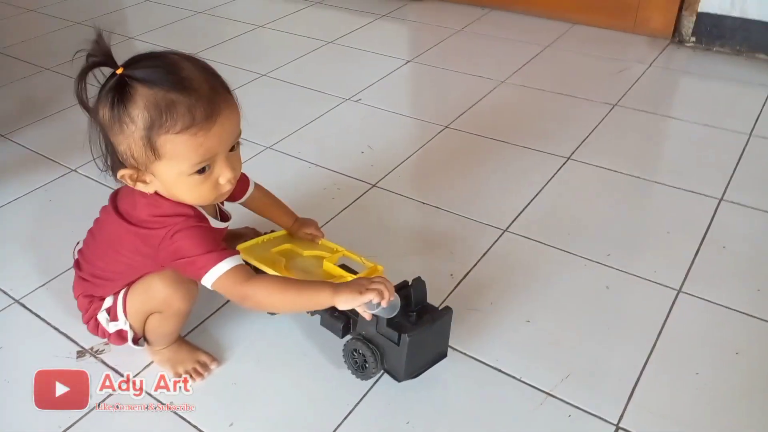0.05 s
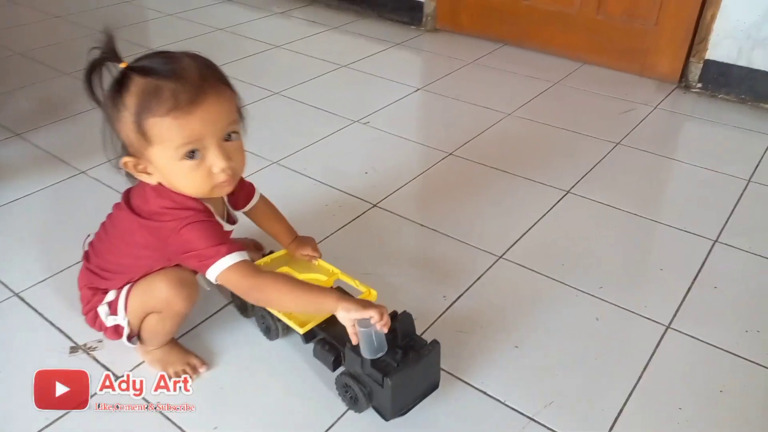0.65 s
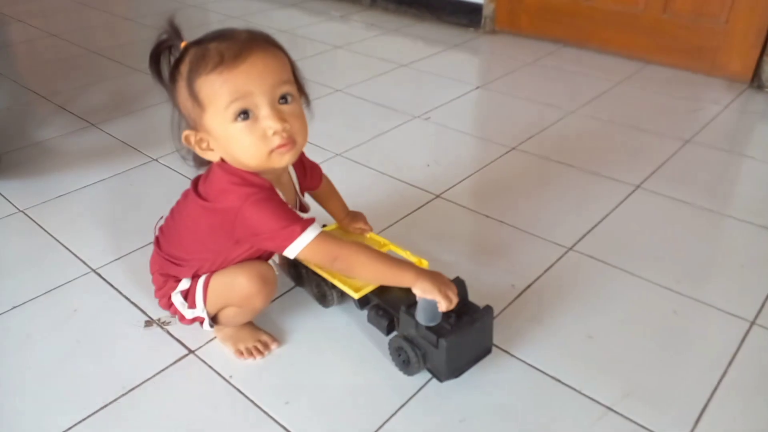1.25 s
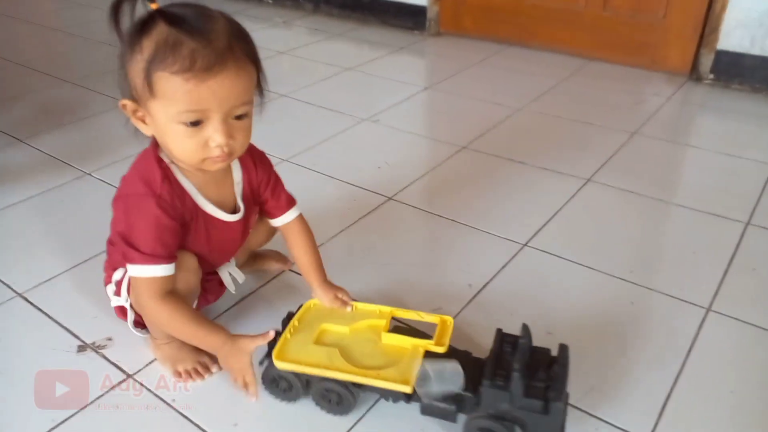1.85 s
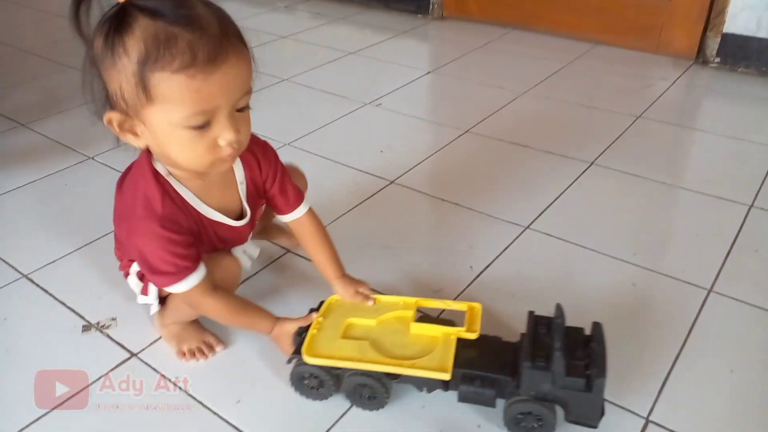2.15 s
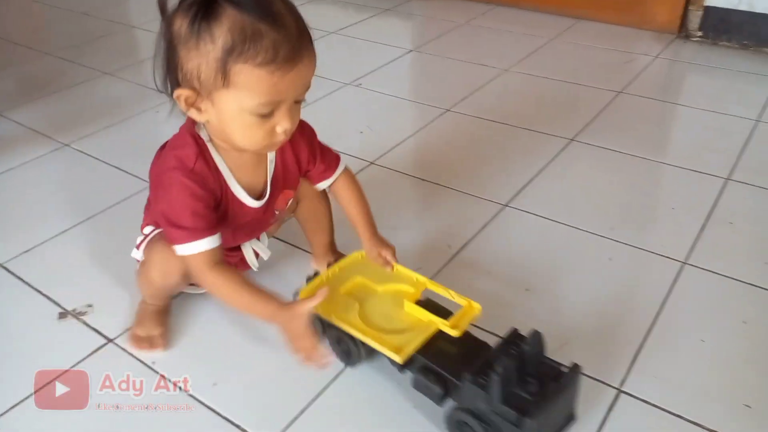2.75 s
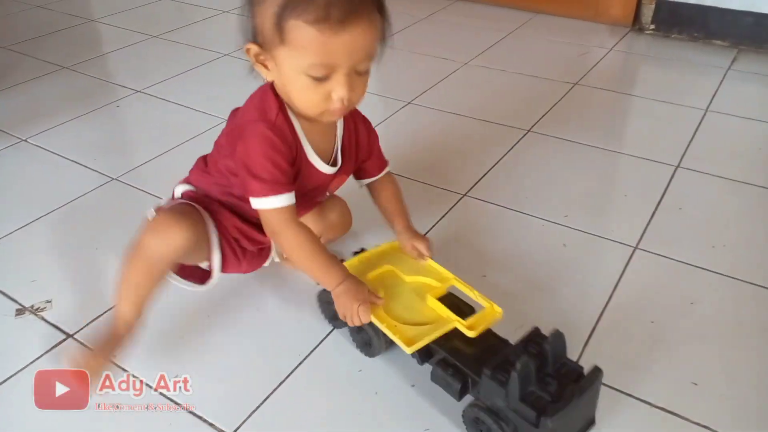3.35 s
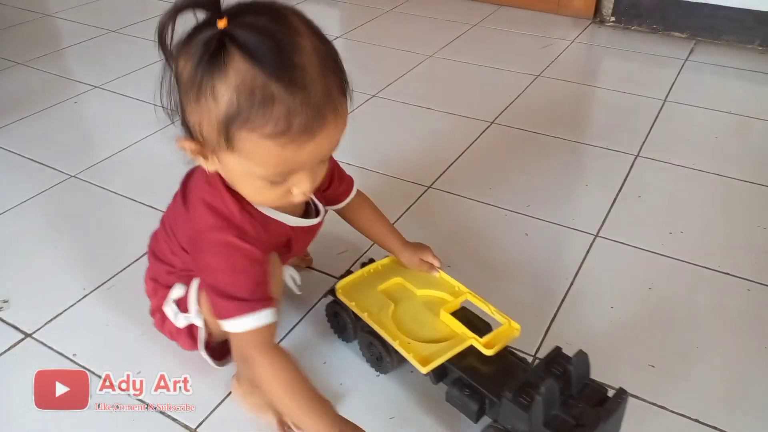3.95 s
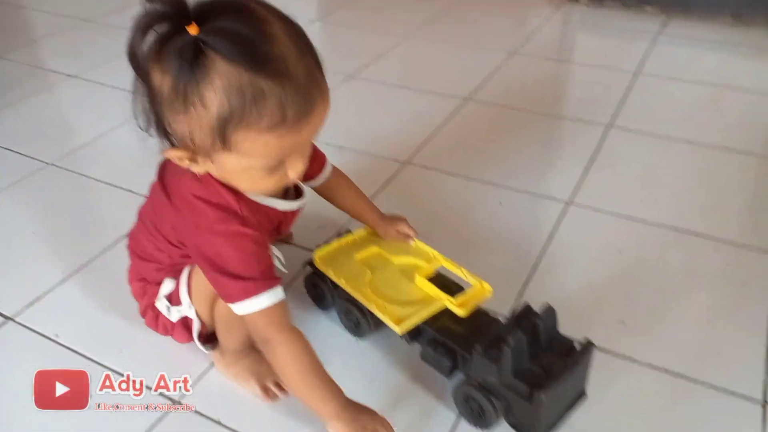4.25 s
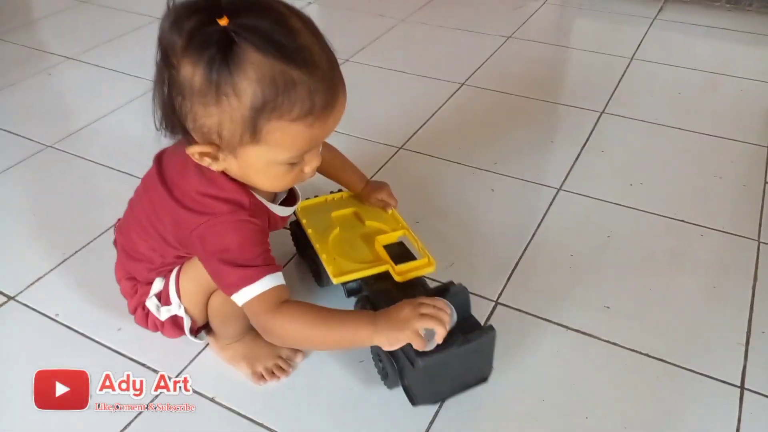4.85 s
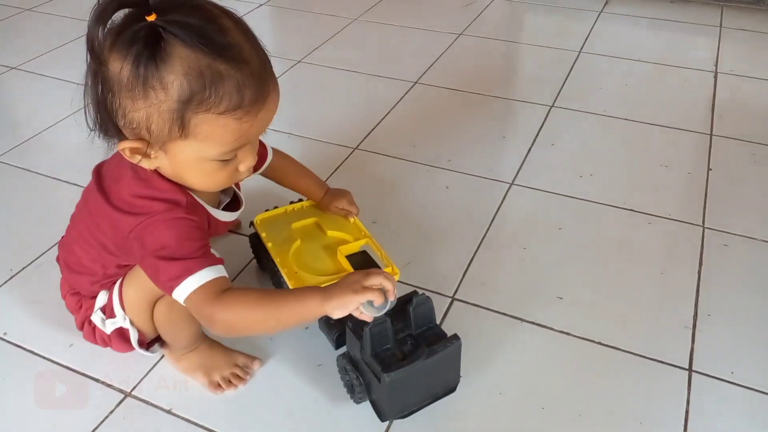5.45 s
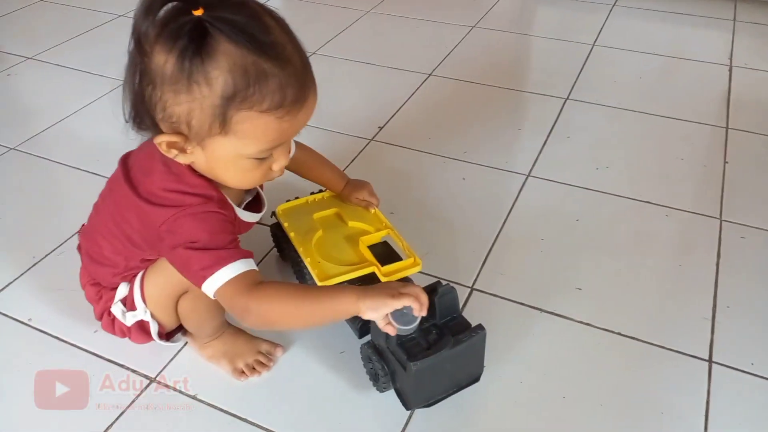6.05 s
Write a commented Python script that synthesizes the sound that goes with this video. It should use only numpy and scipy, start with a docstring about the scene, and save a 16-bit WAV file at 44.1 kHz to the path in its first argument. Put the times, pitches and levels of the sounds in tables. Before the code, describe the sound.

Hollow knocks and rattling wheels of a toy truck pushed across tiles, with a little plastic cup clattering down.

```python
"""Rumble, chatter and hollow knocks: a plastic toy truck is shoved over tiles in a hard, echoing room.
Its wheels drum the shell and scrape the glaze; blows ring its body, panels and edges.
A small plastic cup falls off and bounces to rest, sounding its wall, base and rim.
Hands and clothes brush the toy. Behind it are a low hum and a faint far whine;
the hand-held microphone is bumped a few times."""
import sys
import numpy as np
from scipy import signal
from scipy.fft import rfft, irfft, next_fast_len
from scipy.io import wavfile

SR = 44100
rng = np.random.default_rng(int(sys.argv[2]) if len(sys.argv) > 2 else 0)


def to_wav(sig):
    """Store sig (one row per channel, or 1-D mono) as 16-bit WAV at the path in sys.argv[1].

    Samples outside -1..1 are clipped; the rate is SR.
    """
    pcm = np.clip(np.atleast_2d(sig), -1, 1) * 32767
    pcm = np.round(pcm).astype(np.int16)
    wavfile.write(sys.argv[1], SR, pcm.T)  # frames by channels


N = 272979

# Room decay. Each row: frequency in Hz, t60 in seconds.
ROOM_DECAY = [(150, 0.28), (700, 0.53), (1800, 0.61), (4200, 0.41), (6500, 0.52), (14000, 0.75)]
# Noise spectra. Each row: frequency in Hz, relative density in dB.
AIR_SPECTRUM = [(25, -12.5), (50, 1), (100, 3), (180, -8.5), (300, -5.5), (450, -14), (750, -27.5),
                (2000, -24.5), (6500, -22), (7700, -37.5), (12000, -29.5), (16000, -34)]
GRIP_SPECTRUM = [(25, -26), (65, -5.5), (125, -2.5), (200, -9.5), (400, -13.5), (1000, -63)]
RUB_SPECTRUM = [(300, -6.5), (900, -5), (1500, -1), (2600, -8), (3400, -6.5), (6400, -16.5), (7700, -32)]
HISS_SPECTRUM = [(2500, -18), (4500, 7.5), (6400, 0.5), (7700, -19), (11000, -7.5), (16000, -5.5)]
CRACK_SPECTRUM = [(150, -27), (700, -16.5), (2000, 14.5), (6500, 5.5), (7600, -8.5), (10000, -9.5),
                  (13000, -3.5), (16000, -18)]
RUMBLE_SPECTRUM = [(30, -35), (155, -17.5), (185, -5), (230, -12), (330, -4), (430, 0), (620, -2),
                   (800, -9), (1100, -11.5), (2000, -41.5)]
SCRAPE_SPECTRUM = [(500, -42), (900, 3.5), (1090, 8.5), (1350, 2.5), (1700, 0.5), (2300, -2.5),
                   (3000, -7.5), (4000, -35)]
CHATTER_SPECTRUM = [(1500, -32), (3000, -5), (3500, 1.5), (4150, 6), (4700, 2.5), (5300, -3.5),
                    (6700, -4.5), (7600, -27), (10000, -21), (12500, -14.5), (16000, -28)]
# Far whine and brief tone. Each row: time in seconds, pitch in Hz, level in dB.
WHINE_PATH = [(0, 960, -69.5), (4.25, 1021, -90), (4.45, 1094, -62), (5.0, 1170, -66.5), (5.3, 1088, -67.5),
              (5.5, 1042, -59), (6.19, 1016, -62)]
TONE_PATH = [(4.1, 221, -120), (4.2, 231.4, -66), (4.28, 267.7, -60), (4.34, 290.5, -67.5),
             (4.44, 279, -120)]
# Grip shifts on the microphone. Each row: start in seconds, fade start in seconds, level in dB.
GRIP_SHIFTS = [(0, 1.296, -70), (1.276, 2.023, -49.5), (3.27, 3.574, -57)]
# Microphone bumps. Each row: start in seconds, level in dB.
MIC_BUMPS = [(0.799, -45), (0.813, -46), (0.846, -48), (0.889, -55), (1.428, -35.5), (1.504, -35.5)]
# Rubs on the toy. Each row: start in seconds, fade start in seconds, level in dB, hiss share in dB.
TOY_RUBS = [(-.08, 0.46, -64, -21), (0.52, 0.683, -55.5, -3), (0.802, 1.17, -65.5, -7.5),
            (1.2, 1.448, -63, -2), (3.946, 4.354, -72, 5), (4.52, 4.74, -68.5, -0.5), (4.92, 5.45, -74, -3)]
# Thin swishes. Each row: start and length in seconds, start and end pitch in Hz, level in dB.
SLIDE_SWISHES = [(3.375, 0.22, 2675, 2720, -40.5), (4.025, 0.31, 3104, 2380, -64),
                 (5.012, 0.19, 2824, 3420, -69.5)]
# Resonances. Each row: frequency in Hz, relative level in dB, t60 in seconds.
MIC_MODES = [(73, 0.5, 0.09), (130, 4.3, 0.077), (278, 4.2, 0.024)]
CUP_BASE_MODES = [(2242, -10, 0.0081), (3130, -8, .005), (3470, 5.5, 0.006), (4010, 7, 0.0087)]
CUP_RIM_MODES = [(6710, 0, 0.041)]
SHELL_MODES = [(382, -13, 0.046), (495, -8.5, 0.036), (611, 1.5, 0.013), (774, -1, 0.011),
               (1067, -8, 0.042), (1317, -8.5, 0.017), (1500, 2, 0.0049), (2250, 4.5, 0.0033),
               (2700, -6.5, 0.006), (3570, -1.5, 0.0044), (4080, 10.5, 0.0045), (5300, 3.5, 0.0026),
               (5870, -5.5, 0.0042)]
BODY_MODES, PANEL_MODES, EDGE_MODES = SHELL_MODES[:5], SHELL_MODES[5:9], SHELL_MODES[9:]
# Cup wall. Each row: multiple of the wall pitch, relative level in dB, t60 in seconds.
CUP_WALL_MODES = [(0.998, 10.5, 0.022), (1.278, 0.5, 0.015), (1.52, -7.5, 0.023), (1.932, -14, 0.042)]
# Radiation of small bodies, weak in the bass. Each row: frequency in Hz, gain in dB.
CUP_RADIATION = [(150, -25), (600, -4.5), (1250, -5), (2000, 4), (2450, 8), (3000, -7), (4400, 3),
                 (5300, -18)]
TRUCK_RADIATION = [(50, -20), (250, 0)]
# Cup contacts. Each row: start in seconds, strength in dB, wall and rim shares in dB, wall pitch in Hz.
CUP_BOUNCES = [(0.4238, -69.5, 20, -12, 1440), (0.4599, -49, 3, -20, 1280), (2.0632, -22, 9.5, -15.5, 1277),
               (2.1851, -22.5, 4, -5, 1564), (2.2847, -36.5, 0, -3.5, 1680), (2.357, -23, 2, -5.5, 1600),
               (2.4368, -22, -4, -18, 1570), (2.4564, -38, -7.5, 1.5, 1630), (2.4938, -26, -3, -15, 1655),
               (2.5439, -27, -3, -29, 1560), (2.583, -25, -17.5, -8.5, 1700), (2.6463, -30, 4, -9, 1147),
               (2.67, -40.5, 2, -1.5, 1590), (5.9488, -74.5, 21, -0.5, 1394)]
# Truck shoves. Each row: start, rise and hold in seconds, strength in dB, extra rumble from load in dB.
TRUCK_SHOVES = [(1.422, 0.16, 0.24, -38.5, 0), (1.841, 0.037, 0.15, -43.5, -4.5),
                (2.557, 0.048, 0.016, -33, -9.5), (2.67, 0.02, 0.14, -50.5, 4),
                (2.862, 0.026, 0.01, -46, 3.5), (2.982, 0.027, 0.028, -53.5, 3),
                (3.059, 0.08, 0.12, -42, 4.5), (3.296, 0.054, 0.02, -30, -1), (3.403, .03, .025, -63, -4.5),
                (3.511, 0.044, 0.14, -50, -1), (3.773, .055, 0.021, -47, 2.5),
                (4.446, 0.019, .01, -64, 8.5), (4.537, 0.06, 0.034, -59.5, 8.5),
                (4.661, 0.037, 0.0072, -56, 10.5), (4.736, 0.033, 0.13, -69.5, 10.5)]
# Truck knocks. Each row: start in seconds, strength in dB, body and panel shares in dB.
TRUCK_KNOCKS = [(0.4244, -71.5, 16.5, -10), (0.4857, -58.5, 2.5, -8.5), (0.573, -44, -3, -7),
                (1.049, -41.5, -12.5, -16), (1.111, -55.5, 0.5, 0), (1.3728, -45.5, -4, -5.5),
                (1.4532, -47.5, -3, -4), (1.5118, -40.5, -7, -1.5), (1.6186, -35, -1, 2),
                (1.6748, -27, -11.5, -34), (1.6817, -26, -15, -2), (1.733, -18, -6.5, -33),
                (1.8447, -24, -4, -3), (1.8675, -31.5, 1.5, -9), (1.9192, -29.5, -7, 4),
                (1.9757, -35.5, 0, 7.5), (2.609, -28.5, -2, -10), (2.6223, -25, -4, -16),
                (2.8054, -38.5, -7, -2.5), (2.8789, -41.5, -27, -26), (2.8927, -36, -2.5, -12),
                (3.3026, -39.5, 4, -12), (3.3432, -33, -14, -10), (3.394, -29.5, -10, -18),
                (3.6489, -41, -3, -2.5), (3.6669, -36, -12, -12), (3.812, -49.5, -15, -15),
                (3.8555, -48.5, -1, -3.5), (4.429, -63.5, 3.5, -20), (4.464, -63.5, -17, -14.5),
                (4.7032, -57.5, 9.5, -2.5), (5.1126, -51, -4.5, -2), (5.5227, -65, -8.5, -13),
                (5.9483, -66, -8, -10.5), (6.04, -70, -5, -6)]
# The truck nears, then backs away. Each row: time in seconds, overall room send of the knocks in dB.
KNOCK_ROOM_SEND = [(.57, 5.5), (1.37, 5), (1.73, -0.5), (1.92, -6), (2.62, -5.5), (3.3, 2), (3.66, -2),
                   (5.11, 8.5)]


def amp(db):
    return 10 ** (np.asarray(db) / 20)


def unit(x):
    """x at rms 1."""
    return x / np.sqrt(np.mean(x ** 2) + 1e-20)


def burst(x):
    """x with the energy of 10 ms at rms 1."""
    return x * np.sqrt(SR * .01 / np.sum(x ** 2))


def along(points, hz):
    """(Hz, value) points interpolated on a log axis."""
    point_hz, values = np.transpose(points)
    return np.interp(np.log(hz + 1), np.log(point_hz + 1), values)


def curves(rows):
    """One value per sample for each column after the time."""
    times_s, *columns = np.transpose(rows)
    return [np.interp(np.arange(N) / SR, times_s, column) for column in columns]


def stroke(start_s, rise_s, hold_s, fade_db_per_s):
    """Envelope of one movement: gathers speed, holds, dies away."""
    t = np.arange(N) / SR - start_s
    return np.clip(t / rise_s, 0, 1) ** 2 * amp(-fade_db_per_s * np.maximum(t - rise_s - hold_s, 0))


def add(track, start_s, sound):
    """Mix a sound into the track."""
    part = track[max(round(start_s * SR), 0):][:len(sound)]
    part += sound[:len(part)]


def colour(x, spectrum):
    """x through a minimum-phase filter of the given (Hz, dB) shape."""
    size = 4096
    cepstrum = irfft(np.log(amp(along(spectrum, np.fft.rfftfreq(size, 1 / SR)))))
    cepstrum[1:size // 2] *= 2
    cepstrum[size // 2 + 1:] = 0
    return signal.fftconvolve(x, irfft(np.exp(rfft(cepstrum))))[:len(x)]


def noise(spectrum):
    """Coloured noise, rms 1."""
    return unit(colour(rng.standard_normal(N), spectrum))


def narrow(hz, width_hz):
    """Noise band round a steady or moving centre, rms 1."""
    lowpass = signal.butter(2, width_hz / 2, fs=SR, output="sos")
    drift = signal.sosfilt(lowpass, rng.standard_normal((2, N)))
    phase = 2 * np.pi * np.cumsum(hz * np.ones(N)) / SR
    return unit(drift[0] * np.cos(phase) + drift[1] * np.sin(phase))


def grains(per_s, spread_db):
    """Random tiny contacts, rms 1."""
    size = amp(spread_db * np.clip(rng.standard_normal(N), -2, 2))
    return unit((rng.random(N) < per_s / SR) * size * rng.choice([-1, 1], N))


def ring(modes):
    """Damped modes, struck at slightly new strengths each time."""
    t = np.arange(SR // 4) / SR
    scatter_db = rng.normal(0, 2, len(modes))
    return burst(sum((-1) ** k * amp(db + scatter_db[k] - 60 * t / t60_s) * np.sin(2 * np.pi * hz * t)
                     for k, (hz, db, t60_s) in enumerate(modes)))


def crack(t60_s):
    """Noisy snap of hard plastic making contact."""
    t = np.arange(SR // 4) / SR
    return burst(colour(rng.standard_normal(len(t)) * amp(-60 * t / t60_s), CRACK_SPECTRUM))


def echo(x, delay_s=.005, early_db=3, early_s=0.005):
    """Room response: dense early reflections, then a tail whose decay varies with frequency."""
    hz, t, spectra = signal.stft(rng.standard_normal(SR * 2 // 3), SR, nperseg=256)
    fade_db = -60 * t / along(ROOM_DECAY, hz)[:, None] + early_db * np.exp(-t / early_s)
    tail = signal.istft(spectra * amp(fade_db), SR, nperseg=256)[1]
    return signal.fftconvolve(x, np.pad(tail / np.linalg.norm(tail), (round(delay_s * SR), 0)))


def background():
    """Room air, a low hum, a far whine and one faint rising tone."""
    air = amp(-67.5) * noise(AIR_SPECTRUM)
    hum = amp(-77.5) * narrow(116, width_hz=10)
    whine_hz, whine_db = curves(WHINE_PATH)
    whine = amp(whine_db) * narrow(whine_hz, width_hz=190)
    tone_hz, tone_db = curves(TONE_PATH)
    tone = amp(tone_db) * np.sin(2 * np.pi * np.cumsum(tone_hz) / SR)
    return air + hum + tone + whine


def mic_handling(rest_db=-75.5, rise_s=.15):
    """Fingers on the microphone case: dull thumps over a low rustle that swells as the grip shifts."""
    shifts = sum(amp(db) * stroke(start_s, rise_s, fade_s - start_s - rise_s, fade_db_per_s=62.5)
                 for start_s, fade_s, db in GRIP_SHIFTS)
    out = (amp(rest_db) + shifts) * noise(GRIP_SPECTRUM)
    for start_s, db in MIC_BUMPS:
        add(out, start_s, amp(db) * ring(MIC_MODES))
    return out


def rubbing(rise_s=0.053):
    """Cloth and skin brush the plastic with a rub and fine hiss; something slides with a thin swish."""
    friction = grains(per_s=6800, spread_db=0)
    rub = unit(colour(friction, RUB_SPECTRUM))
    hiss = unit(colour(friction, HISS_SPECTRUM))
    out = np.zeros(N)
    for start_s, fade_s, db, hiss_db in TOY_RUBS:
        swell = stroke(start_s, rise_s, fade_s - start_s - rise_s, fade_db_per_s=66.5)
        out += amp(db) * swell * (rub + amp(hiss_db) * hiss)
    for start_s, length_s, start_hz, end_hz, db in SLIDE_SWISHES:
        swell = curves([(start_s, 0), (start_s + length_s / 4, 1), (start_s + length_s, 0)])[0]
        pitch_hz = curves([(start_s, start_hz), (start_s + length_s, end_hz)])[0]
        out += amp(db) * swell * narrow(pitch_hz, width_hz=840)
    return out


def cup():
    """The cup taps the cab, falls and bounces; each blow is shared by wall, stiff base and rim."""
    out = np.zeros(N)
    for start_s, db, wall_db, rim_db, wall_hz in CUP_BOUNCES:
        wall_modes = [(ratio * wall_hz, mode_db, t60_s) for ratio, mode_db, t60_s in CUP_WALL_MODES]
        wall = amp(db + wall_db) * colour(ring(wall_modes), CUP_RADIATION)
        # Landing on its side: less base, more crack.
        base_db = db - 1.9 * max(wall_db, 0)
        crack_db = db - 2 + 0.27 * min(wall_db, 5)
        base = amp(base_db) * colour(ring(CUP_BASE_MODES), CUP_RADIATION)
        tick = base + amp(crack_db) * crack(t60_s=0.0072)
        rim = amp(db + rim_db) * ring(CUP_RIM_MODES)
        send_db = -3 + 0.5 * wall_db  # the wall radiates sideways, into the room
        room = amp(send_db) * echo(amp(3.5) * wall + amp(-5.5) * tick + amp(-8.5) * rim)
        add(out, start_s, wall + tick + rim)
        add(out, start_s, room)
    return out


def rattle(per_s, t60_s=0.024):
    """Loose parts, each chattering in its own time at its own pitch; rms 1."""
    t = np.arange(SR // 50) / SR
    pings = [amp(-60 * t / t60_s) * np.sin(2 * np.pi * hz * t) for hz in np.geomspace(2200, 6500, 14)]
    return unit(sum(signal.oaconvolve(grains(per_s, spread_db=8.5), ping)[:N] for ping in pings))


def truck_wheels():
    """With each shove, hard wheels drum the hollow shell, scrape the glaze and chatter on loose axles."""
    push, load = np.zeros((2, N))
    for start_s, rise_s, hold_s, db, load_db in TRUCK_SHOVES:
        shove = amp(db) * stroke(start_s, rise_s, hold_s, fade_db_per_s=327)
        push = np.maximum(push, shove)
        load = np.maximum(load, amp(load_db) * shove)
    jolts = grains(per_s=300, spread_db=4.5)
    drum = unit(signal.fftconvolve(jolts, ring(BODY_MODES))[:N])
    roll = unit(colour(grains(per_s=900, spread_db=1), RUMBLE_SPECTRUM))
    rumble = load * unit(roll + amp(-9) * drum)
    scrape = push * unit(colour(jolts + grains(per_s=2400, spread_db=2.5), SCRAPE_SPECTRUM))
    chatter = amp(0.5) * push * unit(colour(jolts + 0.72 * rattle(per_s=150), CHATTER_SPECTRUM))
    room = echo(amp(-2) * (rumble + scrape) + amp(-7) * chatter)[:N]
    return rumble + scrape + chatter + room


def edge_click(tilt_db_per_octave, rebound_s=.002, rebound_db=-4):
    """A thin edge rings, then the loose part strikes again at once."""
    detune = 1 + .08 * rng.uniform(-1, 1)  # each blow lands on another edge
    lowest_hz = EDGE_MODES[0][0]
    edge = ring([(detune * hz, db + tilt_db_per_octave * np.log2(hz / lowest_hz), t60_s)
                 for hz, db, t60_s in EDGE_MODES])
    add(edge, rebound_s * rng.uniform(0.55, 1.8), amp(rebound_db) * edge)
    return burst(edge)


def truck_knocks():
    """Blows on the truck click on its edges and ring its hollow body and panels."""
    out = np.zeros(N)
    for start_s, db, body_db, panel_db in TRUCK_KNOCKS:
        body = amp(db + body_db) * ring(BODY_MODES)
        panel = amp(db + panel_db) * ring(PANEL_MODES)
        edge = edge_click(tilt_db_per_octave=-0.54 * panel_db)  # brighter if the blow misses the panels
        click = amp(db) * (edge + amp(-2.5) * crack(t60_s=.02))
        send_db = np.interp(start_s, *np.transpose(KNOCK_ROOM_SEND))
        room = amp(send_db) * echo(amp(5.5) * body + amp(4.5) * panel + amp(-5) * click)
        add(out, start_s, body + panel + click)
        add(out, start_s, room)
    return colour(out, TRUCK_RADIATION)


def scene():
    """All sources at one microphone."""
    return (truck_wheels() + truck_knocks() + cup() + rubbing() + mic_handling() + background())[None]


def record(dry):
    """Bass cut, peak clipping, band limit."""
    low_hz, top_hz = 48, 16000
    thin = signal.sosfilt(signal.butter(2, low_hz, "high", fs=SR, output="sos"), dry)
    clipped = np.clip(thin, -.95, .95)
    size = next_fast_len(N + SR)
    passband = np.fft.rfftfreq(size, 1 / SR) < top_hz
    return irfft(rfft(clipped, size) * passband, size)[:, :N]


dry = scene()
out = record(dry)
to_wav(out)
```